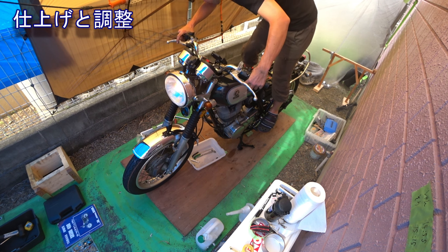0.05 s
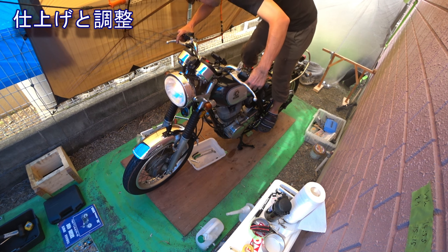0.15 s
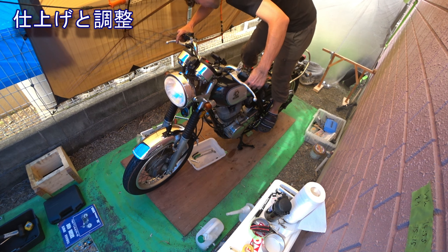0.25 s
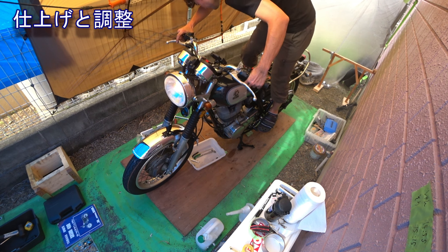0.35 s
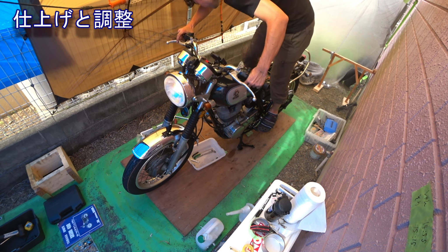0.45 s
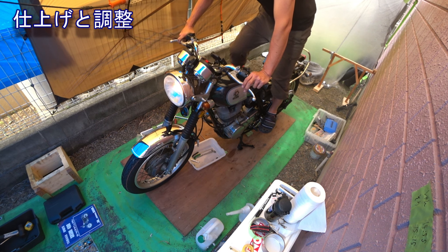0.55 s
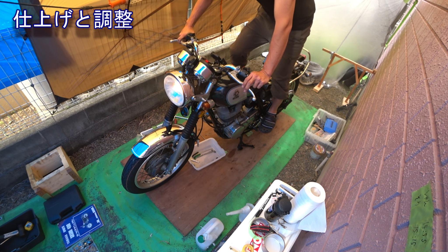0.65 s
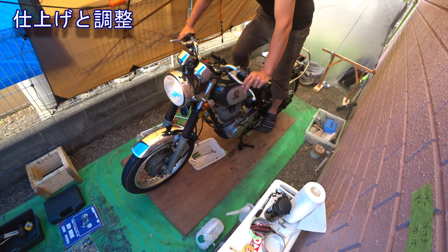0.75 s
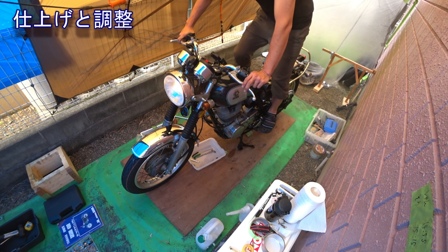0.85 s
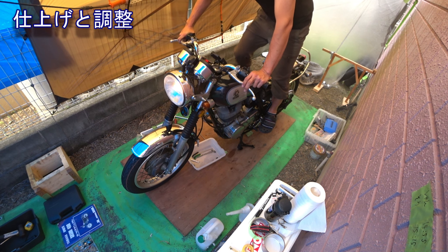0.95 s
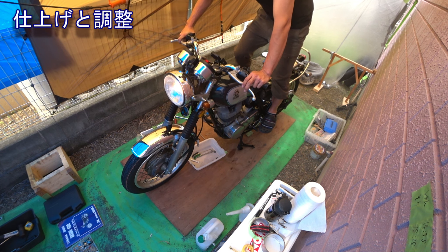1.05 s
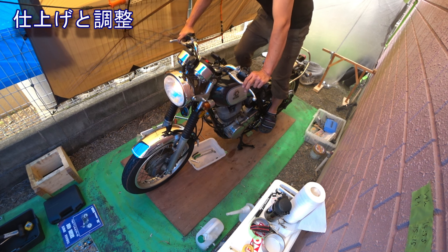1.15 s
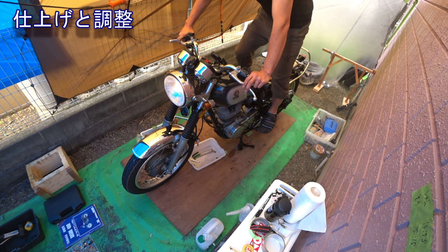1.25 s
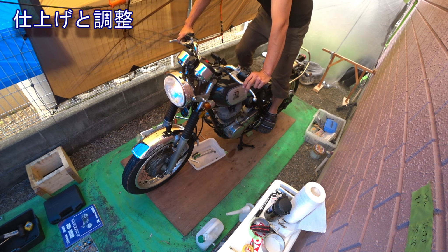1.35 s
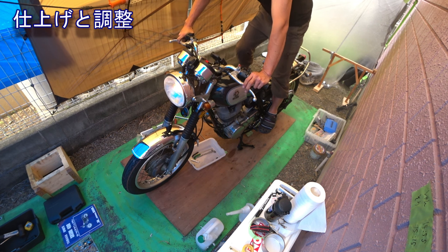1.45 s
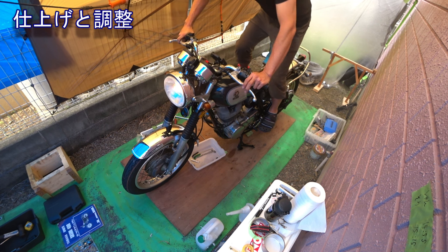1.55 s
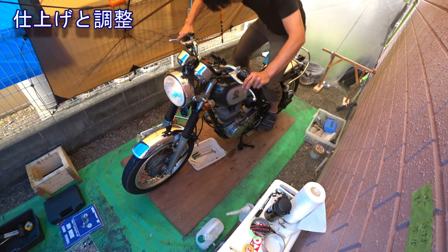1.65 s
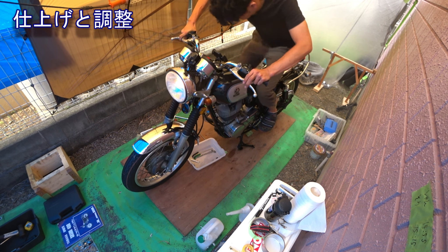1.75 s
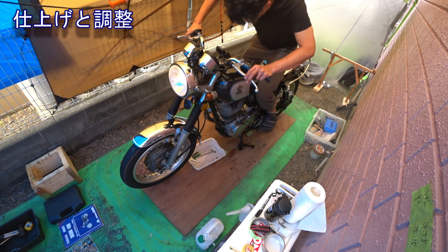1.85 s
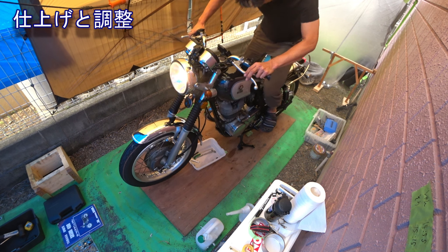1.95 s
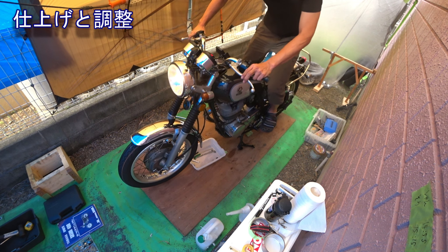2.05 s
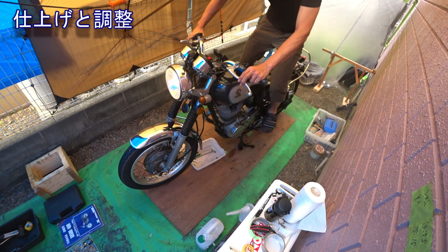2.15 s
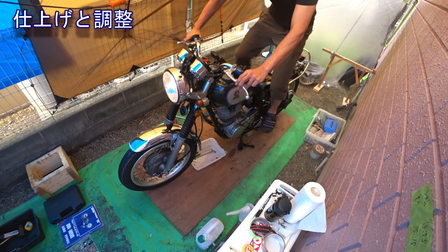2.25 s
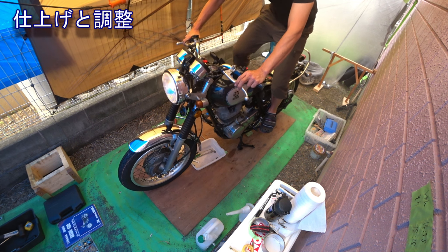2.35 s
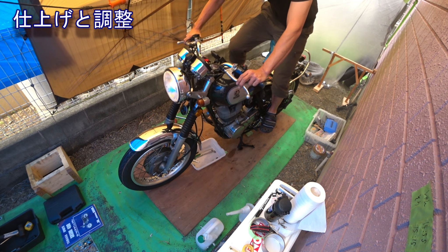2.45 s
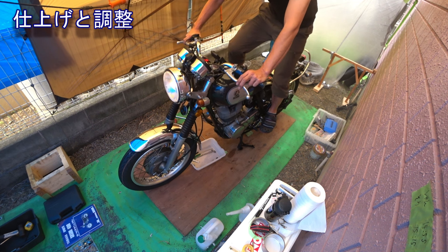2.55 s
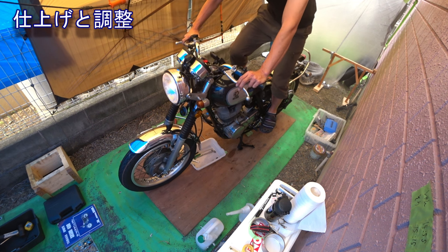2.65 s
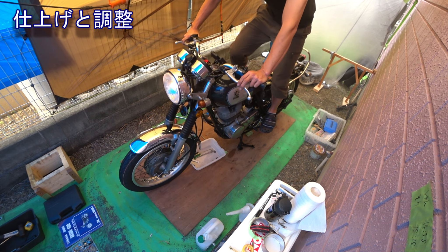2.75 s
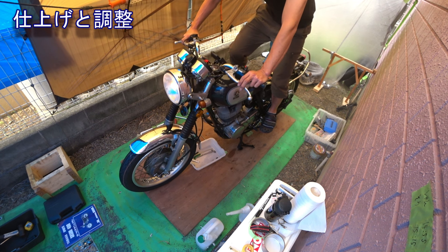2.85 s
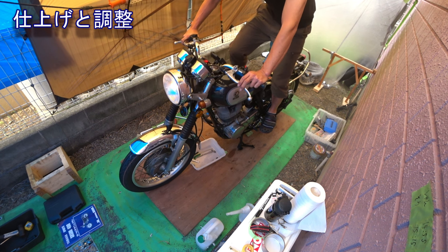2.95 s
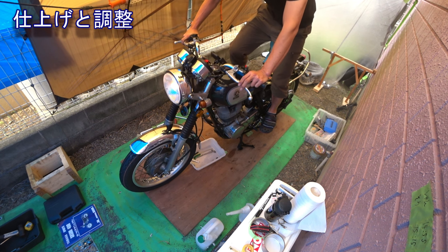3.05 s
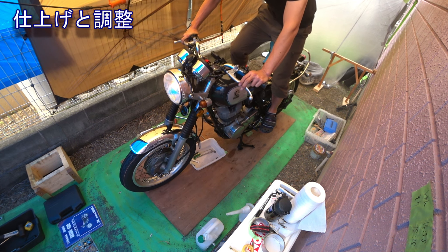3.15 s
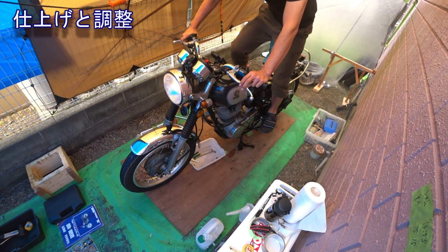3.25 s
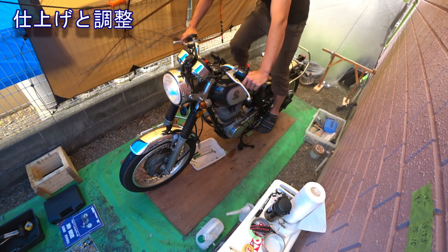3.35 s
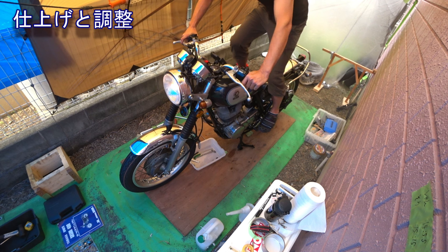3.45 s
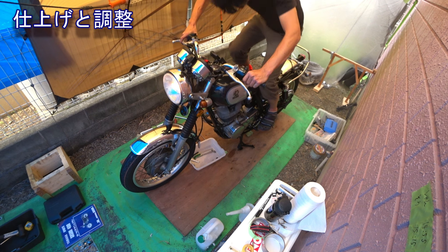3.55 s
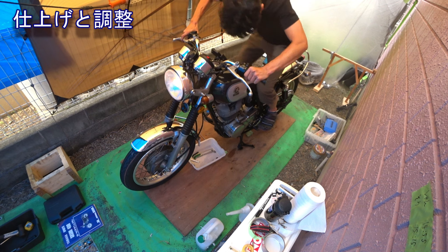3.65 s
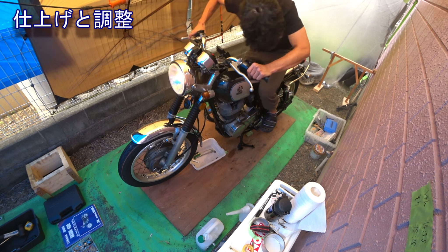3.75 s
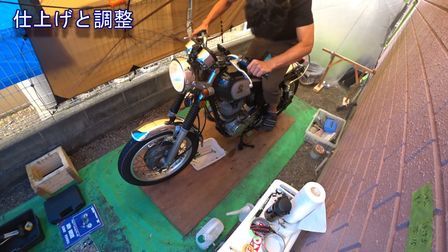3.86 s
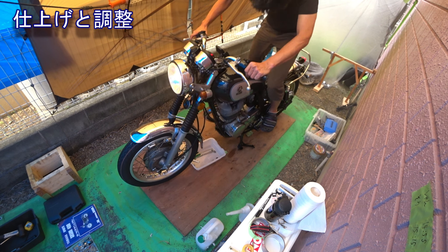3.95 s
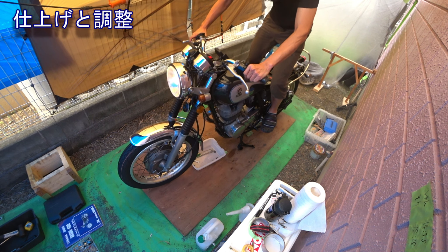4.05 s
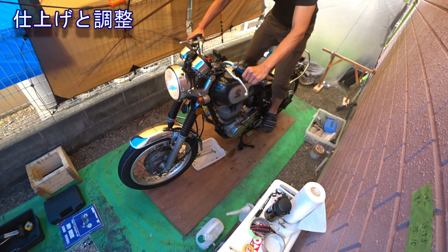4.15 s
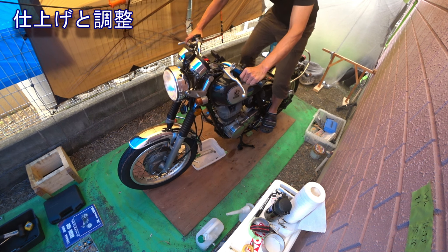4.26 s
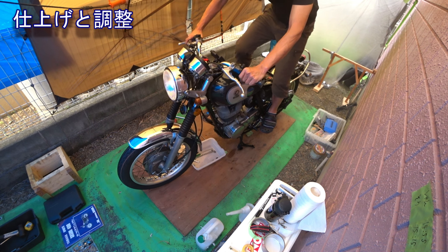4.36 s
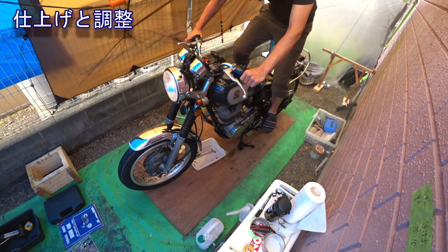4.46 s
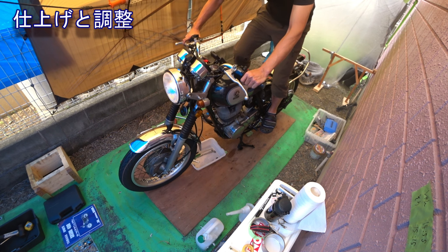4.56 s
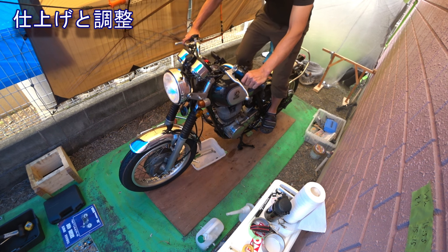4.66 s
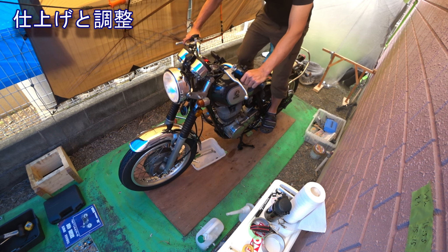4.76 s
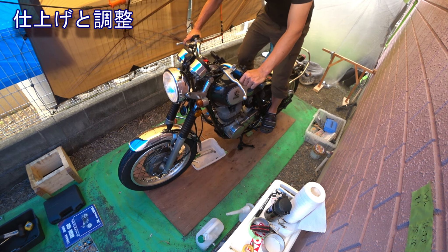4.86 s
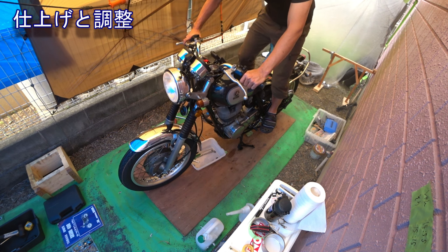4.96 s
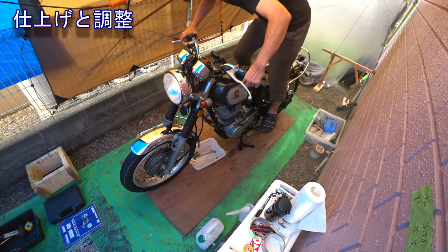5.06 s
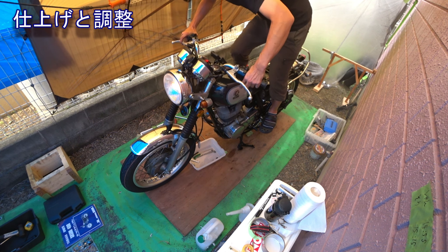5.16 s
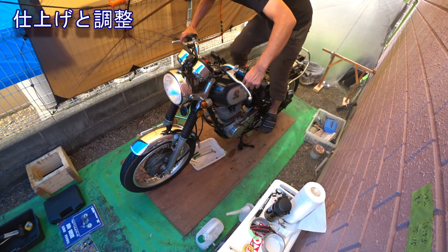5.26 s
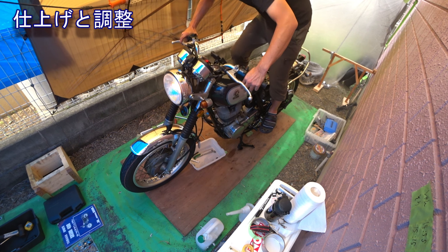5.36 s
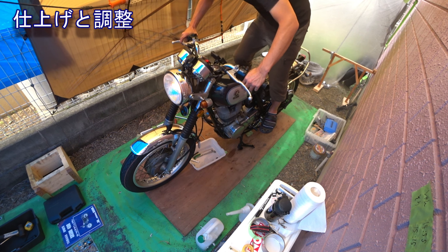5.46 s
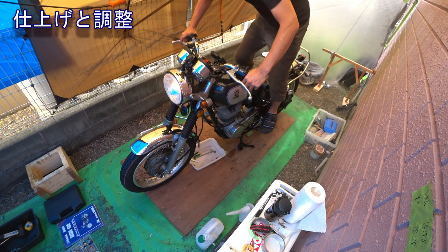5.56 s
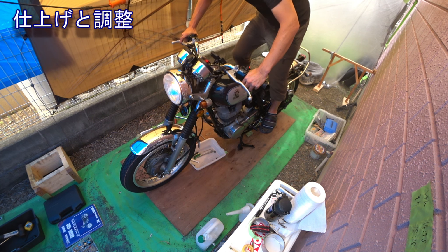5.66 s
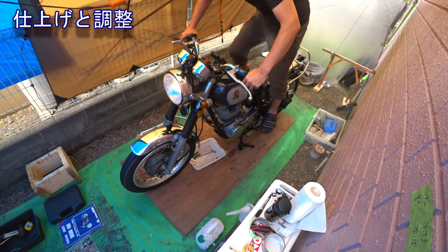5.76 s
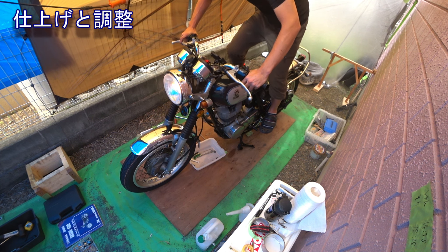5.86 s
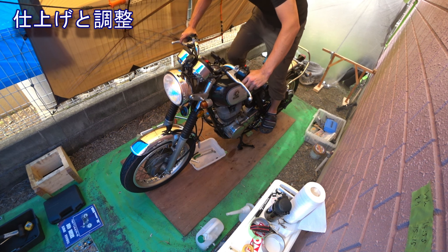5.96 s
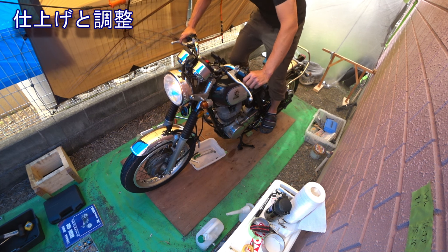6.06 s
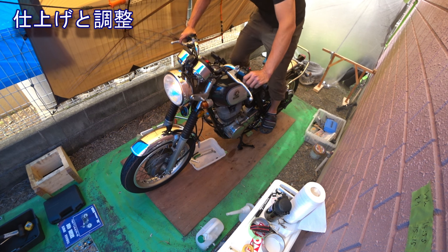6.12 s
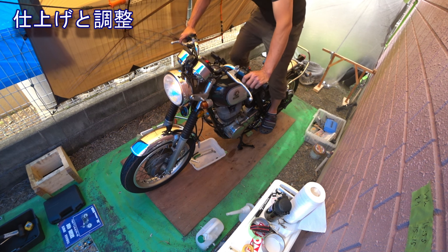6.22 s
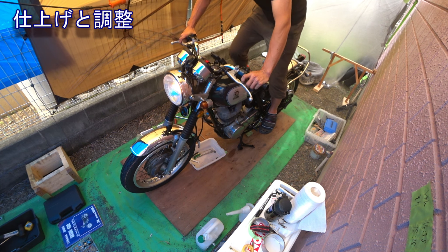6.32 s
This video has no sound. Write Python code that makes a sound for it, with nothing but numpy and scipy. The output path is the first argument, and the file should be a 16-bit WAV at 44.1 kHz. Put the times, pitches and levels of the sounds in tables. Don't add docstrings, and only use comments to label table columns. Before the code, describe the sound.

A motorcycle is kick-started twice in a small walled yard, each heavy stroke whirring gears and ending in slowing ratchet clicks without catching.

```python
import sys
import numpy as np
from scipy import signal
from scipy.fft import rfft, irfft
from scipy.io import wavfile
from scipy.ndimage import uniform_filter1d

SR = 44100
rng = np.random.default_rng(int(sys.argv[2]) if len(sys.argv) > 2 else 0)


def to_wav(sig):
    pcm = np.clip(np.atleast_2d(sig), -1, 1) * 32767
    pcm = np.round(pcm).astype(np.int16)
    wavfile.write(sys.argv[1], SR, pcm.T)


def gain_from_db(level_db):
    decades = np.asarray(level_db, float) / 20
    return 10 ** decades


N = 281799

# pitch_hz, width_hz, level_db
CASE_MODES = [(2060, 170, -5.5), (3133, 260, 1.5), (3895, 96, -1.5), (4310, 420, -1.5), (4855, 180, 2.5),
              (5300, 110, 1.5), (6110, 60, -17), (6620, 143, -1.5), (7380, 88, -2), (7320, 480, -9),
              (7340, 250, 5.5), (8280, 660, -5.5), (10570, 1400, 0)]
# pitch_hz, width_hz, level_db
LEVER_MODES = [(1585, 55, 0), (1630, 45, 0), (1710, 50, -5)]
# pitch_hz, width_hz, level_db
FRAME_MODES = [(1110, 90, -2), (1590, 80, 2), (2060, 100, -2), (3150, 200, -3), (4000, 200, -4),
               (4750, 200, -4), (5600, 250, -4), (7200, 400, 3)]
# pitch_hz, width_hz, level_db
PIPE_MODES = [(297.3, 41, -4), (374, 95, -2.5), (638, 83, -1.5), (677, 69, -5), (860, 110, -3.5)]
# pitch_hz, width_hz, level_db
GROUND_MODES = [(324, 180, -4.5), (602, 59, 2.0), (893, 99, -3.5)]
# pitch_hz, level_db
GEAR_TONE = [(150, -43.5), (300, -20), (1000, -10), (2000, -8), (4400, -9), (7400, -7), (8600, -12),
             (9800, -21), (11000, -18), (14000, -52)]
# pitch_hz, level_db
CRACK_TONE = [(2000, -18.0), (6000, -8.5), (9500, -11.5), (10800, -10)]
# pitch_hz, level_db
SCUFF_TONE = [(150, -19), (350, -6.5), (1300, -4.0), (2000, -11.5), (6000, -47)]
# pitch_hz, level_db
RUSTLE_TONE = [(1200, -11), (2800, 2), (7000, -1.0), (11000, -10.5)]
# pitch_hz, level_db
AIR_TONE = [(18, -43.5), (30, -35), (106, -49), (169, -6), (264, -8.5), (432, 0.5), (527, 0.5), (642, -4),
            (977, -1.5), (1250, -6), (7410, -16.5), (9030, -22), (11000, -14.5), (14300, -46),
            (22000, -120)]
# pitch_hz, likeness (-1 to 1)
AIR_SAME = [(60, 0.71), (170, 0.98), (500, -0.28), (1430, -0.97), (4100, -0.17), (11800, -0.4)]
# time_s, level_db
HUM = [(5.5, -90), (5.65, -72), (6, -72), (6.15, -67), (6.39, -67)]
# start_s, silence_s, fade_in_s
SCENE_CHANGES = [
    (0.5408, .017, 0.019),
    (3.3587, 0.0035, 0.017),
    (5.0605, 0.0022, 0.013),
]
# pitch_hz, decay_s
YARD_DECAY = [(200, 0.06), (1000, 0.29), (4000, 0.27), (10000, 0.24)]
# pitch_hz, level_db
YARD_TONE = [(200, -12), (500, -16.5), (1000, -7.5), (2500, -9.5), (5000, -12.5), (10000, -18)]
# pitch_hz, left_minus_right_db
LEAN = [(200, 2), (1000, 2), (3000, -0.4), (9000, -0.4)]
# pitch_hz, level_db
TREBLE_EDGE = [(11000, 0), (11100, -32.5), (11900, -38), (12400, -64.5)]
# start_s, peak_db, pitch_hz, decay_s, deep_push_db (re
THUMPS = [
    (1.735, -12, 378, 0.055, -45),
    (1.77, -49.5, 331, 0.09, -22.5),
    (1.876, -12, 563, 0.081, -31),
    (1.951, -28.5, 333, 0.075, -21.5),
    (3.692, -9, 352, 0.035, -17.5),
    (3.792, -16, 500, 0.033, -26.5),
]
# start_s, peak_db, hardness (0-1), ring_hz
CLANKS = [(0.6863, -32.5, 0.59, 1600), (1.6554, -24.5, 0.32, 1566), (2.356, -23.5, 0.3, 1607),
          (2.6508, -33, 0.37, 855), (3.6044, -27.5, 0.11, 994), (4.2009, -25, 0.87, 2700),
          (4.235, -22.5, 0.26, 1560), (4.6491, -30, .5, 1583), (5.0739, -16, 1, 1620),
          (5.3956, -28.5, 0.62, 3070), (5.4764, -34, 0.13, 1570), (6.0071, -30, 0.51, 2060),
          (6.0935, -34.5, 0.19, 1610)]
# start_s, peak_db, hardness (0-1), ring_hz
TICKS = [(0.194, -44.5, 0.88, 1620), (0.4788, -49.5, 0, 573), (0.635, -51, .6, 2060),
         (0.8088, -44, 0.33, 1570), (0.8631, -43.5, 0.08, 870), (1.248, -54, 0.9, 6170),
         (2.8502, -46.5, 0.92, 4420), (3.2376, -48.5, 0.8, 1030), (3.5272, -44.5, 0.8, 1600),
         (4.356, -43, 0.24, 1273), (4.5104, -42, 1, 5170), (4.6274, -39.5, 0.46, 2060),
         (5.295, -56, 0.3, 1550), (5.3238, -45, 0.4, 2060), (5.4535, -41, 0.56, 1610),
         (5.628, -55, 0.2, 1260), (5.6732, -53, 0.4, 878), (5.8885, -51, 0.6, 1570),
         (5.917, -49.5, .4, 2060)]
# start_s, peak_db, hardness (0-1), ring_hz
DRAGS = [(0.051, -53.5, 0.53, 3100), (1.1944, -59, 0.7, 4240), (1.4451, -47.5, .25, 2070),
         (1.735, -19.5, 0.5, 4200), (2.3073, -28, 0.54, 3250), (2.616, -41, 0.3, 2030),
         (3.0388, -48.5, 0.63, 2760), (3.0683, -42.5, 0.8, 1420), (3.0948, -35, 0.38, 1405),
         (3.3207, -47, 0.6, 5160), (5.0045, -34.5, 0.42, 1296), (6.0716, -40.5, 0.43, 2060),
         (6.1938, -57, 0, 1135)]
# start_s, peak_db, lever_db (re peak)
MESH = [(1.7846, -6.5, -14), (1.8103, -3.5, -22.5), (1.8349, -15, -9), (1.883, -11.5, -12),
        (1.9677, -10, -23), (3.712, -5, -23), (3.7338, -8.5, -19), (3.7533, -8.5, -11), (3.7933, -11, -12),
        (3.8302, -18, -7), (3.882, -23, -15), (3.903, -11.5, -16)]
# first_tooth_s, last_tooth_s, gap_growth (ratio), peak_db, crack_db (re peak)
FREEWHEELS = [
    (1.9772, 2.2268, 1.075, -8.5, -19),
    (3.9159, 4.127, 1.105, -8.5, -46),
]
TEETH_PASSED = [11, 9]
PAWL_LEVER_DB = [-11, -15, -15]
PAWL_DECAY_S = [.13, .11, .075]
# time_s, level_db
CRANK = [
    [(1.66, -51.5), (1.738, -37), (1.87, -22), (1.94, -26.5), (2.03, -25.5), (2.22, -36), (2.3, -53),
     (2.44, -41), (2.55, -79)],
    [(3.6, -36), (3.66, -43), (3.7, -21.5), (3.76, -20), (3.904, -25.5), (3.936, -16), (4.014, -25),
     (4.16, -36), (4.45, -71.5)],
]
# top_s, chuff_db, push_db, pumping_db
COMPRESSIONS = [
    (1.886, -28, -31, -38.5),
    (3.788, -28, -30.5, -40),
]
# time_s, level_db
SHIFTING = [
    [(0.0, -70.5), (0.546, -59), (0.976, -65.5), (1.412, -63.5), (1.72, -51)],
    [(2.25, -46.5), (2.414, -45.5), (2.804, -58), (3.37, -56)],
    [(3.36, -49.5), (3.56, -45), (3.68, -34.5)],
    [(4.17, -38.5), (4.46, -49.5), (5.02, -51), (5.2, -58), (5.85, -59), (6.39, -55.5)],
]
CLOTH_DB = [0, -4.5, -8.5, -7]
# start_s, length_s, from_hz, to_hz
GLIDES = [
    (.99, .08, 3900, 4150),
    (1.19, .1, 4150, 3800),
    (1.25, .12, 3750, 3800),
    (1.32, .1, 3700, 4250),
    (1.38, .17, 4250, 4200),
    (2.54, .1, 4250, 4300),
    (2.7, .1, 4100, 4500),
    (2.7, .11, 3100, 3350),
]
# start_s, length_s, pitch_hz, width_hz, level_db
SQUEAKS = [
    (.56, .14, 860, 30, -61),
    (1.2, .18, 1500, 250, -66),
    (1.238, .03, 6500, 300, -58),
    (3.315, .035, 5050, 300, -58),
    (3.38, .22, 320, 60, -59),
    (4.91, .12, 1325, 260, -48),
    (5.82, .14, 4200, 500, -67),
    (6.24, .07, 6800, 900, -65),
]


def evened(x):
    return x / np.sqrt(np.mean(x ** 2) + 1e-20)


def read(points, hz):
    f, value = np.transpose(points)
    return np.interp(np.log(hz + 1), np.log(f + 1), value)


def add(mix, s, sound):
    part = mix[..., round(s * SR):][..., :sound.shape[-1]]
    part += sound[..., :part.shape[-1]]


def colour(x, response):
    hz = np.fft.rfftfreq(x.shape[-1], 1 / SR)
    return evened(irfft(rfft(x) * response(hz), x.shape[-1]))


def grit(size, per_s, spread_db):
    strength = gain_from_db(spread_db * np.minimum(rng.exponential(1, size), 4))
    hits = rng.random(size) < per_s / SR
    return rng.standard_normal(size) * strength * hits


def ringing(modes, hz, spread_db=0):
    f, width, db = np.transpose(modes)
    chance = rng.standard_normal((2, len(f)))
    gain = gain_from_db(db + spread_db * chance[0]) * np.sign(chance[1])
    return (gain[:, None] / (1 + 2j * (hz - f[:, None]) / width[:, None])).sum(0)


def blow(decay_s, rise_s, response):
    t = np.arange(16384) / SR
    shape = (1 - np.exp(-t / rise_s)) * gain_from_db(-60 * t / np.clip(decay_s, .02, .4))
    sound = colour(grit(len(t), per_s=16000, spread_db=3.5) * shape, response)
    return sound[:12000] / np.sqrt(uniform_filter1d(sound ** 2, size=180).max())


def patchy(x, depth_db):
    z = signal.stft(x, nperseg=512)[2]
    patches = rng.standard_normal(z.shape[::-1]).T
    patches = evened(uniform_filter1d(uniform_filter1d(patches, size=8, axis=0), size=6, axis=1))
    return evened(signal.istft(z * gain_from_db(depth_db * patches), nperseg=512)[1][:len(x)])


def slope(t, rise_db_s, fall_db_s, start=0, end=0):
    return gain_from_db(-rise_db_s * np.maximum(start - t, 0) - fall_db_s * np.maximum(t - end, 0))


def whistle(size, hz, width):
    r = np.exp(-np.pi * width / SR)
    slow = signal.lfilter([1], [1, -2 * r, r * r], rng.standard_normal((2, size)))
    carrier = np.exp(2j * np.pi * np.cumsum(hz) / SR)
    return evened(((slow[0] + 1j * slow[1]) * carrier).real)


def air():
    frames, hz = N // 256 + 5, np.fft.rfftfreq(1024, 1 / SR)
    a, b, c, d, patches = rng.standard_normal((frames, 513, 5)).T
    patches = evened(uniform_filter1d(uniform_filter1d(patches, size=10, axis=0), size=14, axis=1))
    same = np.clip(read(AIR_SAME, hz), -1, 1)[:, None]
    left = a + 1j * b
    right = same * left + np.sqrt(1 - same ** 2) * (c + 1j * d)
    z = np.array([left, right]) * gain_from_db(read(AIR_TONE, hz)[:, None] + 0.5 * patches)
    return gain_from_db(-59.5) * evened(signal.istft(z, nperseg=1024, noverlap=768)[1][:, :N])


def traffic():
    return gain_from_db(-93) * colour(rng.standard_normal(N), lambda hz: 1 / (1 + (hz / 90) ** 4))


def shuffle(rows, cloth_db):
    s, db = np.transpose(rows)
    t = np.arange(s[0], s[-1], 1 / SR)
    scuff_db = np.interp(t, s, db)
    rustle_db = scuff_db + cloth_db + 0.19 * (scuff_db + 58.5)
    scuff = colour(grit(len(t), per_s=4000, spread_db=0.0), lambda hz: gain_from_db(read(SCUFF_TONE, hz)))
    rustle = colour(grit(len(t), per_s=9000, spread_db=-8), lambda hz: gain_from_db(read(RUSTLE_TONE, hz)))
    sound = gain_from_db(scuff_db) * patchy(scuff, depth_db=2.5) + gain_from_db(rustle_db) * patchy(rustle, depth_db=1.6)
    return s[0], sound * signal.windows.tukey(len(t), .04)


def knock(hard, part_hz, decay_s, soft_ring_db, build):
    thud_db = 2.5 - 31 * hard
    sizzle_db = -23 + 26.5 * hard
    ring_db = soft_ring_db - 6 * hard
    tone = [(400, -59), (900, -2.5), (3000, -5), (5500, sizzle_db - 0.5), (7600, sizzle_db - 3.0),
            (9200, sizzle_db - 14.5), (11000, sizzle_db - 17)]
    part = [(part_hz, .04 * part_hz, 0)]
    rise_s = build * .003 + 0.024 * decay_s ** 2
    body = lambda hz: .8 + .7 * ringing(FRAME_MODES, hz, spread_db=2)
    ground = lambda hz: ringing(GROUND_MODES, hz, spread_db=1) / (1 + (270 / (hz + 1)) ** 4)
    steel = blow(decay_s, rise_s, lambda hz: gain_from_db(read(tone, hz)) * body(hz))
    ring = blow(.6 * decay_s, rise_s, lambda hz: ringing(part, hz))
    thud = blow(2.63 * decay_s, 0.0025, ground)
    return steel + gain_from_db(thud_db) * thud + gain_from_db(ring_db) * ring


def knocks():
    out = np.zeros(N)
    # rows, decay_s, soft_ring_db (re peak)
    kinds = [(CLANKS, .1, 0.5), (TICKS, 0.091, -3), (DRAGS, 0.22, -5.5)]
    for rows, decay_s, soft_ring_db in kinds:
        for s, db, hard, part_hz in rows:
            build = .3 if db < -40 else 1
            add(out, s - build * .003, gain_from_db(db) * knock(hard, part_hz, decay_s, soft_ring_db, build))
    return out


def squeaks():
    out = np.zeros(N)
    for start, length, hz, width, db in SQUEAKS:
        size = round(length * SR)
        add(out, start, gain_from_db(db) * whistle(size, np.full(size, hz), width) * np.hanning(size))
    return out


def glides():
    out = np.zeros(N)
    for start, length, from_hz, to_hz in GLIDES:
        size = round(length * SR)
        glide = np.linspace(from_hz, to_hz, size)
        add(out, start, gain_from_db(-65) * whistle(size, glide, width=330) * np.hanning(size))
    return out


def casing(hz, modes_share=1.0):
    modes = ringing(CASE_MODES, hz * rng.uniform(.985, 1.015), spread_db=2.2)
    return gain_from_db(read(GEAR_TONE, hz)) * (.5 + modes_share * modes)


def gear_whirr(t, rows):
    s, db = np.transpose(rows)
    whirr = colour(grit(len(t), per_s=9000, spread_db=2.4), lambda hz: casing(hz, modes_share=.25))
    return gain_from_db(np.interp(t, s, db) + 0.5) * patchy(whirr, depth_db=0.5)


def pipe_chuff(t, chuff_db, pump_db):
    chuff_gain = gain_from_db(chuff_db) * slope(t, rise_db_s=159, fall_db_s=268, start=-0.096, end=0.057)
    pump_gain = gain_from_db(pump_db) * slope(t, rise_db_s=159, fall_db_s=48, end=0.34)
    pipe = lambda hz: ringing(PIPE_MODES, hz) * hz ** 4 / (hz ** 4 + 260 ** 4)
    return (chuff_gain + pump_gain) * colour(grit(len(t), per_s=2800, spread_db=2.5), pipe)


def deep_push(t, push_db):
    gain = gain_from_db(push_db) * (slope(t, rise_db_s=558, fall_db_s=253.5) + gain_from_db(-37.5))
    deep = lambda hz: ringing([(154.6, 120, 0)], hz) / (1 + (hz / 300) ** 4)
    return gain * colour(rng.standard_normal(len(t)), deep)


def kick(rows, compression):
    t = np.arange(rows[0][0], rows[-1][0], 1 / SR)
    top_s, chuff_db, push_db, pump_db = compression
    sound = gear_whirr(t, rows) + pipe_chuff(t - top_s, chuff_db, pump_db) + deep_push(t - top_s, push_db)
    return rows[0][0], sound * signal.windows.tukey(len(t), .04)


def thumps():
    out = np.zeros(N)
    for s, db, thump_hz, decay_s, deep_db in THUMPS:
        hollow = lambda hz: ringing([(thump_hz, 100, 0)], hz) ** 2
        deep = lambda hz: gain_from_db(deep_db + 6) * ringing([(150, 97, 0)], hz) ** 2
        body = lambda hz: (hollow(hz) + deep(hz)) / (1 + (120 / (hz + 1)) ** 4)
        add(out, s - .001, gain_from_db(db - 7.5) * blow(decay_s, 0.0041, body))
    return out


def tooth(lever_db, crack_db, decay_s, modes_share):
    crack = blow(0.14, .0006, lambda hz: gain_from_db(read(CRACK_TONE, hz)))
    lever = blow(0.045, 0.009, lambda hz: ringing(LEVER_MODES, hz, spread_db=2.5))
    case = blow(decay_s, .0012, lambda hz: casing(hz, modes_share))
    return case + gain_from_db(crack_db - 3.5) * crack + gain_from_db(lever_db + 5.5) * lever


def gear_mesh():
    out = np.zeros(N)
    for s, db, lever_db in MESH:
        add(out, s - .001, gain_from_db(db - 4.5) * tooth(lever_db, crack_db=-15, decay_s=0.15, modes_share=.5))
    return out


def ratchet():
    out = np.zeros(N)
    for (first, last, growth, db, crack_db), count in zip(FREEWHEELS, TEETH_PASSED):
        passed = np.cumsum(growth ** np.arange(count)) - 1
        way = passed / passed[-1]
        level_db = db + 0.5 * (2 * way - 1) + .8 * rng.standard_normal(count)
        lever_db = np.interp(way, [0, .5, 1], PAWL_LEVER_DB)
        decay_s = np.interp(way, [0, .5, 1], PAWL_DECAY_S)
        decay_s[-1] = 0.14
        for i, s in enumerate(first + way * (last - first)):
            sound = tooth(lever_db[i], crack_db, decay_s[i], modes_share=0.99)
            add(out, s - .001, gain_from_db(level_db[i] - 4.5) * sound)
    return out


def motor_hum():
    pitch_hz = 245
    s, db = np.transpose(HUM)
    t = np.arange(N) / SR
    hum = np.sin(2 * np.pi * pitch_hz * t) + .45 * whistle(N, np.full(N, pitch_hz), width=18)
    return gain_from_db(np.interp(t, s, db)) * hum


def flanks(x):
    taps = rng.standard_normal(180) * np.hanning(180) / 8
    treble = signal.butter(4, 7800, "high", fs=SR)
    glance = signal.lfilter(*treble, np.convolve(x, taps)[:N])
    return gain_from_db(-10.5) * np.array([glance, -glance])


def yard(x):
    taps = np.zeros((2, 22000))
    at = np.arange(200, 21980, 20) + rng.integers(0, 20, (2, 1089))
    np.put_along_axis(taps, at, rng.choice([-1., 1.], at.shape), 1)
    hz, t, z = signal.stft(taps, SR, nperseg=256)
    tail = signal.istft(z * gain_from_db(-60 * t / read(YARD_DECAY, hz)[:, None]), SR, nperseg=256)[1]
    wet = signal.fftconvolve(x[None], tail / np.linalg.norm(tail[0]), axes=1)[:, :N]
    return irfft(rfft(wet) * gain_from_db(read(YARD_TONE, np.fft.rfftfreq(N, 1 / SR))), N)


def scene():
    near = knocks() + thumps() + gear_mesh() + ratchet()
    for rows, compression in zip(CRANK, COMPRESSIONS):
        add(near, *kick(rows, compression))
    for rows, cloth_db in zip(SHIFTING, CLOTH_DB):
        add(near, *shuffle(rows, cloth_db))
    near = signal.lfilter(*signal.butter(2, 100, "high", fs=SR), near)
    far = squeaks() + glides() + motor_hum() + traffic()
    return gain_from_db(-3.5) * near + flanks(near) + yard(near) + far + air()


def low_pass(x):
    return signal.sosfilt(signal.butter(12, 12380, fs=SR, output="sos"), x)


def record(dry):
    hz, t = np.fft.rfftfreq(N, 1 / SR), np.arange(N) / SR
    out = .68 * np.tanh(dry / .68)
    for s, silence, fade in SCENE_CHANGES:
        out = out * np.where(t < s, 1, np.clip((t - s - silence) / fade, .02, 1))
    lean_db = np.array([[.5], [-.5]]) * read(LEAN, hz)
    edge_db = np.interp(hz, *np.transpose(TREBLE_EDGE))
    out = irfft(rfft(out) * gain_from_db(lean_db + edge_db), N)
    return low_pass(out)


dry = scene()
out = record(dry)
to_wav(out)
```